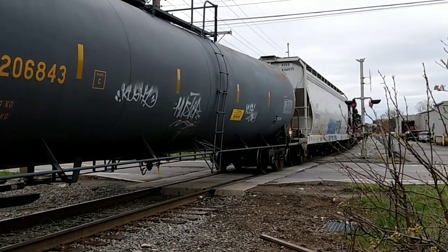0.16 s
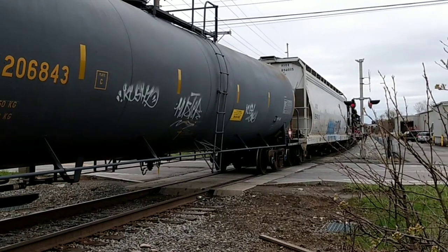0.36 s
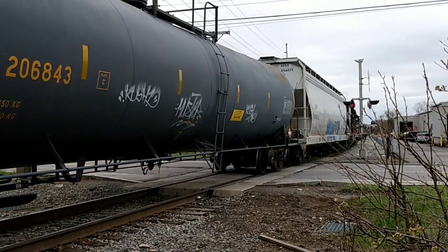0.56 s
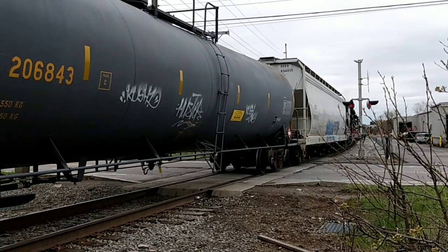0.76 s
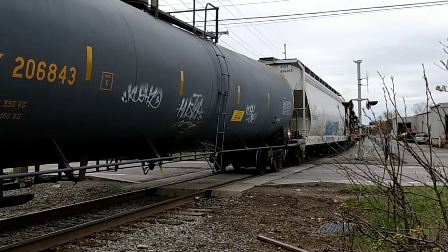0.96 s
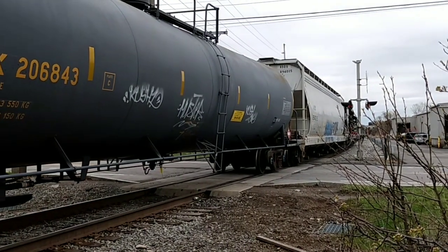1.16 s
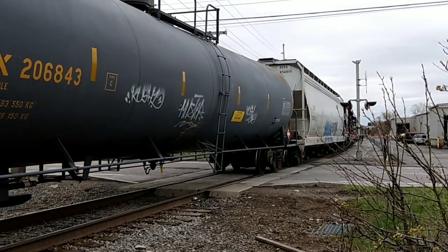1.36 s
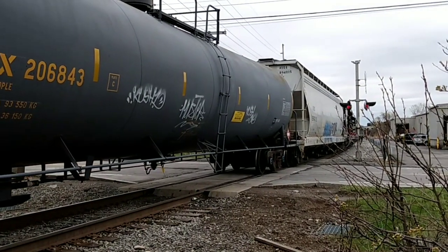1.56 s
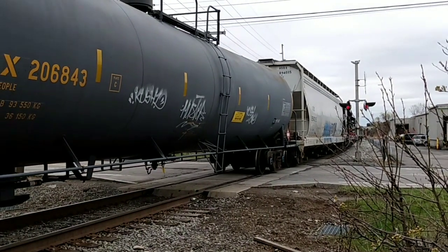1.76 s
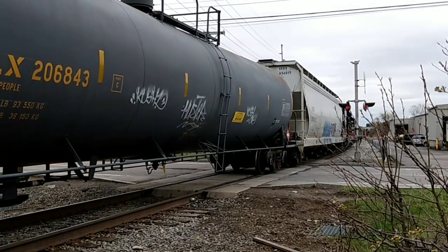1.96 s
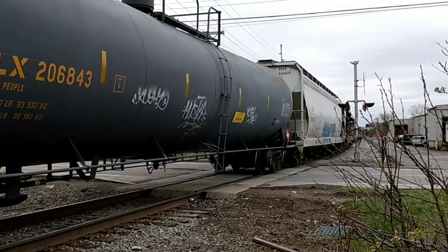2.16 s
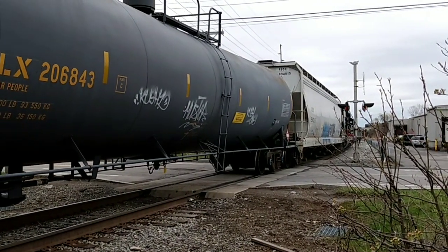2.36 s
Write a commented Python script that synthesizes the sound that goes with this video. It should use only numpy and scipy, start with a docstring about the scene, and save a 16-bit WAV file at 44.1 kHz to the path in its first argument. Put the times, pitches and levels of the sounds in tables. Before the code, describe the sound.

A freight train creeps past close by, slightly left, starting quietly with two soft hollow booms and a spit of air. From about 0.4 to 1.5 seconds, air brakes hiss in sharp, sputtering bursts with a high pipe ring, over clashing couplers, brief steel squeaks, dull thumps and deep wheel rumble. A weaker clank and hiss come at 1.8 seconds, then the rumble fades as wind buffets the left microphone.

```python
"""A freight train creeps past.

Close by, its air brakes let off sharp hissing bursts that ring the steel pipes. Couplers and brake
rigging clash, steel squeaks on steel, and the car bodies thump and boom. Then the rumble of the wheels
fades. The train is on the left, so its sound reaches the left microphone first.
Near the end a little wind buffets that side."""
import sys
import numpy as np
from scipy import signal
from scipy.fft import rfft, irfft, next_fast_len
from scipy.io import wavfile
from scipy.ndimage import uniform_filter1d, map_coordinates

SR = 44100
rng = np.random.default_rng(int(sys.argv[2]) if len(sys.argv) > 2 else 0)


def file_out(sig):
    """Save sig as 16-bit WAV at sys.argv[1]."""
    # one column per channel
    cols = np.atleast_2d(sig).T
    # limit, then scale
    lim = np.clip(cols, -1, 1)
    pcm = np.round(lim * 32767).astype(np.int16)
    wavfile.write(sys.argv[1], SR, pcm)


N = 105840
TIME = np.arange(N) / SR


def amp(db):
    """Turn decibels into a number to multiply by."""
    return 10 ** (np.asarray(db) / 20)


def unit(x):
    """Scale a signal to an average power of 1."""
    return x / np.sqrt(np.mean(x ** 2) + 1e-20)


def along(points, hz):
    """Read a table of (frequency, value) between its rows, on a log frequency scale."""
    freqs, values = np.transpose(points)
    return np.interp(np.log(hz + 1), np.log(freqs + 1), values)


def curve(points):
    """Join (time, value) points with straight lines."""
    return np.interp(TIME, *np.transpose(points))


def wobble(rate):
    """A smooth curve through `rate` random points a second."""
    return map_coordinates(rng.standard_normal(N // 40), [TIME * rate], mode="mirror")


def envelope(start, rise, hold, fade):
    """Rise, hold, then die away. A fade time is the seconds it takes to drop 60 dB."""
    age = TIME - start
    return np.clip(age / rise, 0, 1) * amp(-60 * np.maximum(age - rise - hold, 0) / fade)


def filtered(x, response):
    """Turn each frequency up or down, or delay it, as `response` says."""
    size = next_fast_len(N + SR // 4)
    return irfft(rfft(x, size) * response(np.fft.rfftfreq(size, 1 / SR)), size)[..., :N]


# How alike the two microphones sound (frequency [Hz], likeness [0 to 1])
LIKENESS = [(60, .98), (130, .965), (280, .93), (600, .66), (1300, .64), (2500, .42), (12000, .3)]


def stereo_pair(noises, gain):
    """Shape two unrelated noises and blend them into partly alike left and right sides."""
    def blend(hz):
        angle = np.arccos(along(LIKENESS, hz)) / 2
        return gain(hz) * np.array([np.cos(angle), np.sin(angle)])
    mid, side = filtered(noises, blend)
    return unit(np.array([mid + side, mid - side]))


def rush(tone, patchy_db):
    """Stereo noise shaped by a tone table; narrow bands come and go by about patchy_db."""
    bands = signal.stft(rng.standard_normal((2, N)), nperseg=1024)[2]
    patches = uniform_filter1d(rng.standard_normal(bands.shape[1:]), size=3, axis=0)
    patches = uniform_filter1d(patches, size=11, axis=1)
    noise = signal.istft(bands * amp(patchy_db * unit(patches)), nperseg=1024)[1][:, :N]
    return stereo_pair(noise, lambda hz: amp(along(tone, hz)))


# Loudness of the cars' drone, the wheels' rumble and the grinding on the rail (time [s], level [dB])
DRONE_LEVELS = [(0, -47), (.09, -41), (.3, -33.5), (.38, -30.5), (.49, -19.5), (.58, -19), (.67, -29.5),
                (.83, -19.5), (1.1, -20), (1.2, -27), (1.44, -26), (1.62, -36), (1.72, -49), (1.81, -28),
                (2.15, -40), (2.32, -42.5), (2.4, -49)]
RUMBLE_LEVELS = [(0, -41), (.1, -61), (.22, -46), (.32, -44), (.39, -20), (.5, -19.5), (.63, -27.5),
                 (.9, -21), (1.07, -25.5), (1.16, -27.5), (1.33, -25), (1.55, -35), (1.75, -35),
                 (1.85, -27.5), (2.12, -38.5), (2.25, -49.5), (2.4, -51)]
GRIND_LEVELS = [(0, -39), (.12, -46), (.3, -35.5), (.5, -25), (1.3, -33), (1.7, -39), (1.9, -43.5),
                (2.2, -43.5), (2.4, -54)]
# Tone of the same three sounds (frequency [Hz], level [dB])
DRONE_TONE = [(20, -22), (40, -36), (55, -2), (70, 0.5), (85, 9.5), (105, -9.5), (150, 2), (400, -69)]
RUMBLE_TONE = [(60, -12), (120, -3), (180, 5.5), (320, 4), (430, -1), (700, -9), (1500, -42.5), (4000, -44)]
GRIND_TONE = [(250, -31), (500, 4.5), (650, 2.5), (900, 4), (1120, 0), (1400, -7.5), (1800, -4.5),
              (2700, -12.5), (3700, -15.5), (4400, -23.5), (8000, -39)]


def rolling():
    """The cars drone deeply while the wheels rumble and grind on the rail."""
    drone = amp(curve(DRONE_LEVELS)) * rush(DRONE_TONE, patchy_db=2.2)
    rumble = amp(curve(RUMBLE_LEVELS) + 0.4 * wobble(rate=38)) * rush(RUMBLE_TONE, patchy_db=0.15)
    grind = amp(curve(GRIND_LEVELS) + 0.66 * wobble(rate=28)) * rush(GRIND_TONE, patchy_db=4)
    return drone + rumble + grind


# Air leaking between the bursts (time [s], level [dB])
LEAK_LEVELS = [(0, -48), (.1, -72), (.2, -53.5), (.32, -50), (.42, -30), (.7, -25), (.95, -27), (1.28, -31),
               (1.5, -34), (1.68, -41.5), (1.72, -38.5), (1.95, -44.5), (2.19, -51), (2.32, -61.5),
               (2.4, -79)]
# Bursts of air (start [s], rise [s], hold [s], level [dB], fade [s])
AIR_BURSTS = [(0.333, 0.019, 0.044, -31.5, 0.5), (0.412, 0.049, 0.099, -20, 0.26),
              (0.748, 0.023, 0.03, -19.5, 0.39), (0.927, 0.014, 0.009, -25, .4),
              (1.006, 0.026, 0.071, -20.5, 0.19), (1.164, 0.036, 0.047, -28.5, .3),
              (1.297, 0.03, 0.062, -20.5, 0.34), (1.81, 0.015, 0.022, -34.5, .4)]
# Tone of the leak and of the bursts (frequency [Hz], level [dB])
LEAK_TONE = [(500, -25), (1500, 7.5), (2800, -3), (3900, 2.5), (4900, -3), (6500, 0), (8000, -5),
             (9800, 0.5), (12000, -0.5), (14000, -8), (15800, -7)]
BURST_TONE = [(300, -58), (1200, -4.5), (2400, 4), (3200, 1), (4100, 3.5), (4900, 0.5), (7300, -0.5),
              (8300, -2.5), (11000, 3), (13500, -0.5), (15800, -8.5)]


def air_brakes():
    """Air hisses out in a leak and in sputtering bursts; each burst rings the pipes."""
    power, ring = 0, 0
    for start, rise, hold, db, fade in AIR_BURSTS:
        power += (amp(db) * envelope(start, rise, hold, fade)) ** 2  # overlapping noises add in power
        ring += amp(db - 7.5) * envelope(start, rise=0.02, hold=hold, fade=0.3) * pipe_ring()
    bursts = np.sqrt(power) * rush(BURST_TONE, patchy_db=4.1)
    leak = amp(curve(LEAK_LEVELS)) * rush(LEAK_TONE, patchy_db=3.3)
    sputter = amp(0.54 * wobble(rate=50) + 0.85 * wobble(rate=260))
    return sputter * (bursts + leak) + ring


# Spits of a valve (start [s], level [dB], fade [s])
VALVE_SPITS = [(0.11, -36.5, 0.17), (1.918, -39.5, 0.16)]
# Their thin tone (frequency [Hz], level [dB])
SPIT_TONE = [(2000, -32), (3800, 1), (5000, -1), (7000, 6.5), (8500, -4.5), (11000, 6.5), (15800, 3.5)]


def valve_spits():
    """A valve lets out short, sudden puffs of air."""
    flow = sum(amp(db) * envelope(start, rise=0.006, hold=0.013, fade=fade)
               for start, db, fade in VALVE_SPITS)
    return flow * rush(SPIT_TONE, patchy_db=2)


# Soft knocks on the tank (start [s], level [dB])
TANK_KNOCKS = [(0.117, -24.5), (0.2, -26)]


def tank_booms(hz=74.5):
    """Each knock makes the hollow tank boom on one low note."""
    return sum(amp(db) * envelope(start, rise=0.0093, hold=0, fade=0.36)
               * np.sin(2 * np.pi * hz * (TIME - start)) for start, db in TANK_KNOCKS)


def rubbed_tone(start, hz, db, length, waver_hz):
    """One wavering note of rubbed steel that swells and stops."""
    swell = np.sin(np.pi * np.clip((TIME - start) / length, 0, 1))
    phase = 2 * np.pi * np.cumsum(hz + waver_hz * wobble(rate=350)) / SR
    return amp(db) * np.sqrt(2) * swell * np.sin(phase)


# Squeaks of steel (start [s], pitch [Hz], level [dB], length [s])
STEEL_SQUEAKS = [(0.145, 1126, -39, 0.13), (.32, 8400, -42, 0.03), (0.424, 11640, -40, 0.025),
                 (0.517, 10800, -28, 0.12), (.56, 14400, -31, 0.066), (0.77, 2998, -29, 0.073),
                 (.95, 4000, -30.5, 0.077), (.965, 5370, -36, 0.033), (1.014, 3190, -27, 0.047),
                 (1.064, 7074, -21, 0.02)]


def squeaks():
    """Steel rubs on steel in brief, high squeaks."""
    return sum(rubbed_tone(*row, waver_hz=34) for row in STEEL_SQUEAKS)


# Clashes of the couplers, which link the cars, and of the brake rods (start [s], level [dB], fade [s])
IRON_CLASHES = [(.225, -36.5, 0.28), (.342, -31.5, 0.47), (0.367, -25, 0.92), (0.402, -15, 0.74),
                (0.46, -17, 0.37), (0.659, -24, 0.87), (0.708, -20.5, 1), (0.798, -21, 0.3),
                (0.936, -23.5, 0.84), (1.018, -20, 0.46), (1.058, -21, 0.32), (1.18, -27, 0.63),
                (1.218, -24.5, 0.36), (1.312, -21.5, 0.52), (1.362, -26.5, 0.34), (1.552, -33.5, 0.39),
                (1.791, -26, 0.91), (2.105, -40, 0.52)]
# Tone of the struck iron (frequency [Hz], level [dB])
IRON_TONE = [(150, 2), (300, -8), (520, -3.5), (720, -5), (1000, 3), (1300, -2.5), (1800, -3.5),
             (2400, -14.5), (4000, -13), (8000, -53.5)]


def couplers():
    """Heavy iron parts clash with a dense, rattling ring that dies quickly."""
    power = sum((amp(db) * envelope(start, rise=0.009, hold=0, fade=fade)) ** 2
                for start, db, fade in IRON_CLASHES)
    flicker = amp(0.42 * wobble(rate=100))
    return np.sqrt(power) * flicker * rush(IRON_TONE, patchy_db=0.5)


# Notes the steel pipes ring at (pitch [Hz], level [dB])
PIPE_NOTES = [(2702, -6), (5276, -6), (7025, 0), (7483, 0), (8586, -4), (9168, -3), (9959, -6), (10691, -2),
              (11639, -3), (12683, -2)]


def pipe_ring(width_hz=22, scatter_db=2.5):
    """Rushing air stirs the pipes' notes; each burst favours different ones."""
    notes = [(pitch, amp(db + scatter_db * rng.standard_normal())) for pitch, db in PIPE_NOTES]

    def peaks(hz):
        return sum(gain / (1 + ((hz - pitch) / width_hz) ** 2) for pitch, gain in notes)
    return stereo_pair(rng.standard_normal((2, N)), peaks)


# Notes a car body rings at (pitch [Hz], relative level [dB], fade [s])
BODY_NOTES = [(113, 0.5, 0.048), (176.7, 1.5, 0.11), (220, 0, 0.11), (313, -8, 0.057), (517, -6.5, 0.23)]
THUMP_RISE_S = 0.0052


def body_ring(start):
    """A struck car body rings on its low notes, a little differently each time."""
    ring = 0
    for hz, db, fade in BODY_NOTES:
        level = amp(db + 2 * rng.standard_normal()) * envelope(start, THUMP_RISE_S, hold=0, fade=fade)
        pitch = hz * (1 + 0.052 * rng.standard_normal())
        ring += level * np.sin(2 * np.pi * (pitch * (TIME - start) + rng.random()))
    return ring


# Thumps of the car bodies (start [s], relative level [dB])
BODY_THUMPS = [(0.409, -40), (0.493, -19), (.683, -19.5), (0.752, -12), (0.818, -22.5), (0.887, -27),
               (0.963, -12.5), (1.063, -13.5), (1.202, -10), (1.314, -12.5)]
# Tone of their rattle (frequency [Hz], level [dB])
RATTLE_TONE = [(30, -50), (80, -9), (170, -3.5), (300, -8.5), (500, -18), (1200, -46.5), (4000, -78)]


def body_thumps():
    """The cars jolt, and each dull thump is part rattle, part ring."""
    power = sum((amp(db) * envelope(start, THUMP_RISE_S, hold=0, fade=0.18)) ** 2
                for start, db in BODY_THUMPS)
    rattle = np.sqrt(power) * rush(RATTLE_TONE, patchy_db=0.3)
    ring = sum(amp(db) * body_ring(start) for start, db in BODY_THUMPS)
    return amp(-6.5) * (rattle + ring)


# One low groan (start [s], pitch [Hz], level [dB], length [s])
FRAME_GROAN = (0.93, 294, -26.5, 0.13)


def frame_groan():
    """A car frame groans under the strain."""
    return rubbed_tone(*FRAME_GROAN, waver_hz=7.5)


# Puffs of wind (start [s], level [dB], fade [s])
WIND_PUFFS = [(1.8, -26.5, 0.67), (1.925, -12, 0.17), (1.994, -18, 0.28), (2.078, -16.5, 0.22),
              (2.129, -21, 0.5), (2.281, -29.5, 0.39)]
# Their deep tone (frequency [Hz], level [dB])
WIND_TONE = [(25, -26), (45, -4), (65, 3), (90, 6), (190, -0.5), (330, -8.5), (500, -26.5), (1200, -48.5)]


def wind():
    """Short puffs buffet the left microphone only."""
    push = sum(amp(db) * envelope(start, rise=0.011, hold=0, fade=fade) for start, db, fade in WIND_PUFFS)
    left = push * rush(WIND_TONE, patchy_db=0)[0]
    return np.array([left, np.zeros(N)])


# How much louder the train is on the left (frequency [Hz], left minus right [dB])
LEFT_BALANCE = [(200, 1), (400, -1.5), (700, 4), (1290, -6.5), (2380, 2.5), (4400, 0), (8120, 2.5),
                (15000, 7)]
# How much sooner it arrives there (frequency [Hz], head start [ms])
LEFT_LEAD = [(200, .2), (1380, .42), (2700, .68), (15000, .68)]


def scene():
    """The train and the wind, heard from beside the track."""
    def microphones(hz):
        # each side takes half of the gap in level and in time
        left = amp(along(LEFT_BALANCE, hz) / 2) * np.exp(1j * np.pi * hz * along(LEFT_LEAD, hz) / 1000)
        return np.array([left, 1 / left])
    air = air_brakes() + valve_spits()
    metal = squeaks() + frame_groan() + couplers() + body_thumps() + tank_booms()
    return filtered(air + metal + rolling(), microphones) + wind()


def record(dry):
    """Round off the loudest peaks and cut the very highest treble."""
    ceiling, top_hz = 0.85, 15900
    rounded = dry / (1 + np.abs(dry / ceiling) ** 6) ** (1 / 6)
    return filtered(rounded, lambda hz: hz < top_hz)


dry = scene()
out = record(dry)
file_out(out)
```